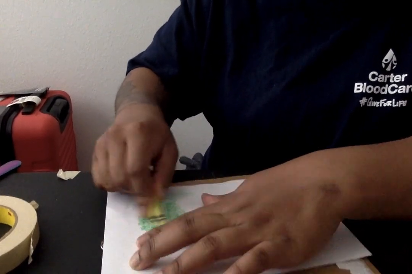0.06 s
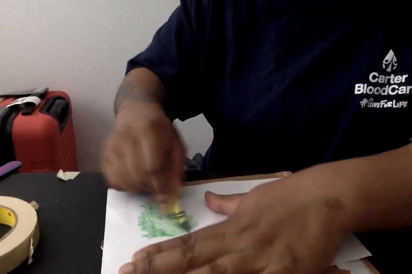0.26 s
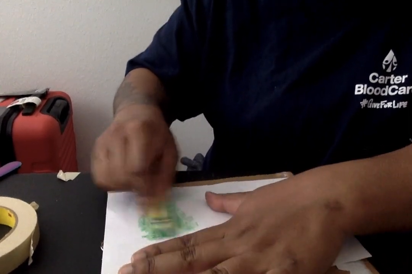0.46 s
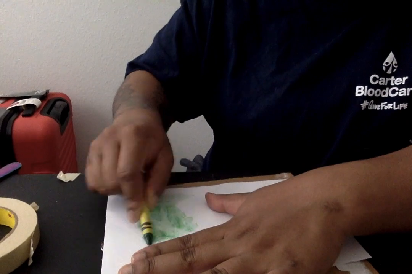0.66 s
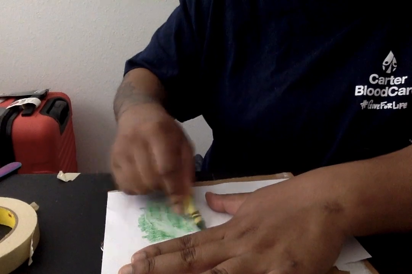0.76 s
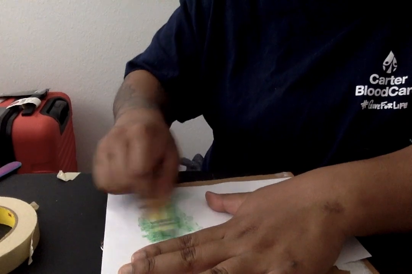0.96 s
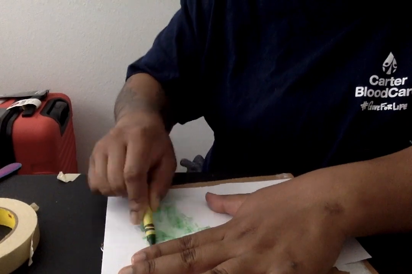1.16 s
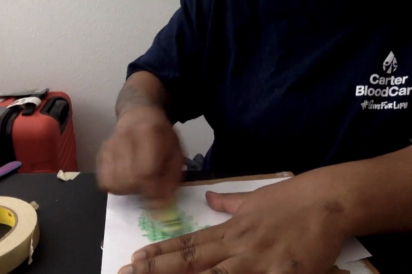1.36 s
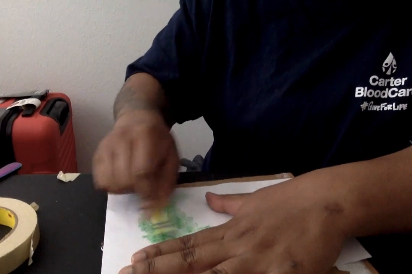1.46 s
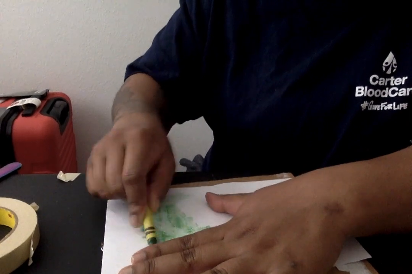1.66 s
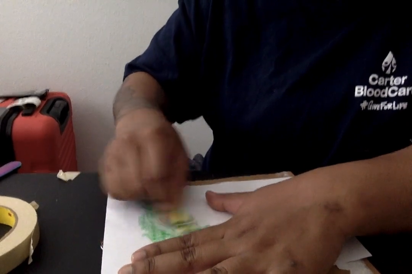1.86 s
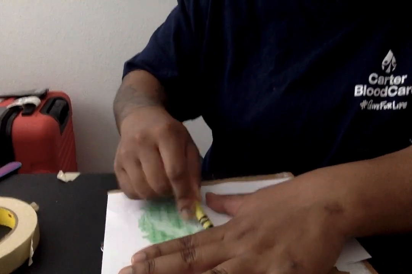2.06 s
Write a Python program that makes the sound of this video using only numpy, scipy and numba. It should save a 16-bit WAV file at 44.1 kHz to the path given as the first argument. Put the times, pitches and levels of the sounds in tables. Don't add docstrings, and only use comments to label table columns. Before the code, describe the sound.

Fast crayon strokes on a sheet of paper, low bumpy table rumble with light papery scratches

```python
import sys
import numpy as np
from scipy import signal
from scipy.fft import rfft, irfft
from scipy.io import wavfile
from scipy.ndimage import uniform_filter1d
from numba import njit

SR = 44100
rng = np.random.default_rng(int(sys.argv[2]) if len(sys.argv) > 2 else 0)


def level_to_linear(level):
    exponent = np.asarray(level, float) / 20
    return 10 ** exponent


def waveform_to_disk(signal):
    frames = np.transpose(np.atleast_2d(signal))
    scaled = np.clip(frames, -1, 1) * 32767
    samples = np.round(scaled).astype(np.int16)
    wavfile.write(sys.argv[1], SR, samples)


N = 92610

# start_s, length_s, table_db, paper_db, wax_db
STROKES = [(0.0, 0.14, -69.5, -64.5, -72), (0.084, 0.17, -46.5, -66.5, -81.5),
           (0.212, 0.13, -49.5, -62.5, -65), (0.334, 0.12, -60.5, -66.5, -74),
           (0.457, 0.13, -57.5, -74, -77.5), (0.577, 0.12, -60.5, -73, -76.5),
           (0.714, 0.11, -51.5, -71, -75.5), (0.826, 0.11, -60, -71.5, -76),
           (0.974, 0.13, -51, -69.5, -77.5), (1.091, 0.11, -54, -69, -75), (1.236, 0.1, -48, -66, -76.5),
           (1.337, 0.14, -57.5, -69.5, -76), (1.487, 0.13, -49, -62.5, -77),
           (1.601, 0.11, -45.5, -61.5, -74.5), (1.73, 0.14, -52, -67.5, -76), (1.87, 0.088, -53, -67, -75),
           (2, 0.11, -54, -68, -78)]
# centre_hz, width_hz, level_db
TABLE_MODES = [(135.3, 70, -2), (175, 76, 1), (250, 37.7, 1), (328.5, 60, -6), (390, 180, -11.5),
               (529.6, 100, -7), (739, 370, -11.5), (846, 490, -11)]
# centre_hz, width_hz, level_db
PAPER_MODES = [(1314, 2000, -5.5), (1950, 320, -3.5), (2450, 158, -1.5), (2953, 820, -1.5),
               (4050, 350, -9.5)]
# centre_hz, width_hz, level_db
WAX_MODES = [(4290, 2900, -1.5), (5800, 1020, -5.5), (9250, 1700, -11), (11500, 8400, -4),
             (13900, 1900, -3)]
# start_s, peak_db, pitch_hz, ring_t60_s, knock_db
BUMPS = [(.008, -53.5, 132.4, 0.26, 0.5), (0.117, -25.5, 134.5, 0.091, -16.5),
         (0.133, -31, 133.8, 0.27, -4.5), (0.194, -37.5, 335, 0.046, -14), (.222, -25.5, 241, 0.024, -9),
         (0.229, -28, 158, 0.036, -41), (0.261, -40, 173, 0.076, -1.5), (0.289, -36, 175, 0.036, -29),
         (0.318, -44, 131, 0.052, -45), (0.386, -33.5, 176, 0.052, -8.5), (.41, -36.5, 164.6, 0.032, -16),
         (0.5, -60.5, 246, 0.13, -17), (0.521, -47, 133.6, 0.16, -12), (0.738, -49, 154, 0.022, -10),
          (0.784, -40.5, 243, 0.042, -27), (0.868, -42, 250, 0.061, -21), (0.913, -46.5, 167, 0.077, -14),
          (0.997, -48, 250, 0.059, -1), (1.046, -31, 240.7, 0.056, -10.5),
          (1.129, -34.5, 163.3, 0.07, -16.5), (1.176, -37, 163.4, 0.09, -14.5),
          (1.244, -51, 216, 0.074, -5.5), (1.257, -35.5, 232, 0.035, -11.5),
          (1.294, -33.5, 187, 0.075, -12.5), (1.38, -33, 165.6, 0.067, -25.5),
          (1.418, -41, 162.3, 0.093, -11.5), (1.502, -45, 247, 0.066, -9), (1.522, -42, 204, 0.058, -2.5),
          (1.543, -34, 201.6, 0.071, -12.5), (1.6371, -30.5, 200.4, 0.033, -10.5),
          (1.684, -38.5, 167.7, 0.11, -13), (1.766, -47, 268, 0.033, -33),
          (1.799, -40.5, 184.2, 0.055, -15), (1.946, -47.5, 168, 0.046, -11.5),
          (2.039, -43.5, 236, 0.072, -7),
         (.003, -49, 153, 0.01, -2.5),
    (0.09, -52, 244, 0.018, -18),
    (0.237, -36.5, 213, 0.029, -4),
    (.306, -49, 199, 0.026, -23),
    (1.557, -41, 171, 0.039, -22),
    (1.579, -48, 144, 0.073, -32),
    (1.648, -39, 191.5, 0.057, -14),
    (2.027, -47.5, 240, 0.035, -34),
    (2.051, -50, 250, 0.057, -20),
]
# centre_hz, width_hz, level_db
KNOCK_MODES = [(335, 188, 3), (564, 320, -10.5), (760, 456, -5.5), (990, 380, -13)]
# start_s, peak_db, pitch_hz, crack_db
SNAPS = [(.0034, -47.5, 2200, 6), (.004, -48.5, 4000, -16.5), (0.0418, -46.5, 2060, -26),
         (0.1143, -38.5, 2330, -8.5), (0.1146, -44.5, 3840, -16), (.12, -36, 1950, -33),
         (.351, -60.5, 2360, -25), (.387, -49.5, 2370, -11), (.522, -58, 2450, -28),
         (0.794, -61.5, 3170, -30), (0.87, -69, 2450, -25), (1.023, -55.5, 2460, -25),
         (1.114, -61, 2350, -19), (1.274, -56.5, 3980, -34), (1.277, -47.5, 2270, -34),
         (1.306, -54.5, 2580, -25), (1.3859, -42, 2380, -21), (1.3845, -53, 4050, -30),
         (1.4, -45.5, 2420, -27), (1.42, -51.5, 2440, -30), (1.524, -45, 2310, -23),
         (1.526, -47, 3740, -26), (1.6292, -46, 2100, -20), (1.637, -47.5, 3200, -24),
         (1.8113, -45, 3100, -29), (1.8264, -46.5, 2400, -32), (1.846, -54.5, 2420, -38),
         (1.903, -55.5, 2170, -20), (2.0661, -44, 2660, -32), (2.082, -51, 2930, -25),
         (.61, -64.5, 2020, -35), (0.7565, -62.5, 2840, -30), (1.027, -59, 1950, -30),
         (1.252, -75, 2190, -30), (1.381, -57, 2270, -32), (1.7836, -55, 2540, -25),
         (1.905, -57, 4050, -35), (1.833, -55, 2560, -35), (2.0671, -46.5, 2130, -37),
         (2.066, -53.5, 3370, -35)]
# start_s, peak_db, pitch_hz
TAPS = [(0.043, -49.5, 1710), (.0425, -47, 2740), (0.115, -48, 1530), (.193, -42, 538),
        (0.387, -54.5, 1800), (.218, -38, 737), (0.219, -47, 1320), (.2205, -31, 375.5), (.499, -57, 540),
        (.648, -59.5, 520), (.744, -54, 506), (1.003, -49.5, 517), (1.026, -46, 580), (1.026, -67, 900),
        (1.11, -76, 970), (1.174, -54.5, 595), (1.245, -51, 552), (1.259, -47.5, 526), (1.294, -61, 970),
        (1.528, -44, 864), (1.533, -47.5, 519), (1.632, -57, 1035), (1.638, -44, 563), (1.806, -62, 509),
        (1.907, -68, 570), (2.038, -54.5, 960)]
# start_s, length_s, level_db, lower_edge_hz
SLIDES = [
    (-.02, 0.12, -59, 12800),
    (0.117, 0.031, -83, 11200),
    (0.21, 0.039, -57.5, 11500),
    (0.25, 0.054, -52.5, 11400),
    (0.352, 0.016, -72, 11500),
    (0.1121, 0.0024, -39, 11000),
    (.119, 0.0059, -57, 11000),
    (.136, 0.0039, -62, 10900),
]
# start_s, length_s, level_db, pitch_hz
FLECKS = [
    (0.747, .03, -91, 15300),
    (.765, 0.027, -93, 14300),
    (0.85, 0.039, -90, 14100),
    (1.043, .025, -78, 14300),
    (1.127, .03, -85, 15000),
    (1.526, 0.032, -90, 13500),
    (1.635, 0.038, -80, 15600),
    (1.64, 0.022, -84, 14300),
    (1.77, 0.036, -78, 14300),
    (1.885, 0.024, -79, 13900),
]
# frequency_hz, level_db
ROOM_SPECTRUM = [(18, -55), (30, -19), (245, -4.5), (426, -19), (1630, -26.5), (2480, -21), (7270, -32.5),
                 (14000, -34.5), (16000, -46)]

RISE_SHARE, RISE_POWER, FALL_POWER = 0.49, 1.88, 2.6
SLIPS_PER_S, SLIP_SCATTER_DB, RASP_PER_S, RASP_SCATTER_DB = 900, 2.5, 3000, 3.5
PAPER_LINGER = 0.75
PAPER_PATCH_DB, WAX_PATCH_DB, PATCH_S = 4, 2.5, 0.008
SWAY_HZ, SWAY_DB, SWAY_LAG_S = 77.5, -8, 0.018
BUMP_RISE_S, BUMP_DB = 0.0051, 3
SAG_SHARE, SAG_S = 0.14, 0.0055
KNOCK_S, OVERTONE_DB, MODE_RATIO = 0.011, -7, 1.45
SHEET_SHARE, SNAP_PEAK_S = 0.45, 0.00065
SNAP_TAIL_DB, SNAP_TAIL_S, CRACK_S = -12.5, 0.017, 0.00072
TAP_CYCLES = 1.6
PALM_RISE_SHARE, PALM_POWER, PALM_GRAIN_DB = 0.68, 0.8, 2
FLECK_WIDTH_HZ = 700
ROOM_DB = -76
TOP_HZ = 15800


@njit
def svf(x, hz, width):
    y, band, low = np.empty(len(x)), 0., 0.
    g, k = np.tan(np.pi * hz / SR), width / hz
    for i in range(len(x)):
        v = (band + g * (x[i] - low)) / (1 + g * (g + k))
        band, low, y[i] = 2 * v - band, low + 2 * g * v, k * v
    return y


def steep(x, hz, width):
    return svf(svf(x, float(hz), float(width)), float(hz), float(width))


def unit(x):
    return x / np.sqrt(np.mean(x ** 2))


def body(x, modes):
    out = 0
    for k, (hz, width, db) in enumerate(modes):
        out = out + (-1) ** k * level_to_linear(db) * unit(steep(x, hz, 1.13 * width))
    return out


def grains(rate, scatter_db):
    when, sign, size = rng.random((3, N))
    slips = (when < rate / SR) * np.sign(sign - 0.5)
    return slips * level_to_linear(scatter_db * np.minimum(-np.log(1 - size), 3.5))


def swell(start, length, share=RISE_SHARE, rise=RISE_POWER, fall=FALL_POWER):
    p = (np.arange(N) / SR - start) / length
    up = np.sin(np.pi / 2 * np.clip(p / share, 0, 1)) ** rise
    down = np.sin(np.pi / 2 * np.clip((1 - p) / (1 - share), 0, 1)) ** fall
    return up * down


def add(out, start, x):
    i = max(int(start * SR), 0)
    out[i:i + len(x)] += x[:N - i]


def patchy(modes, noise_share, patch_db):
    out, k = 0, int(PATCH_S * SR)
    for mode in modes:
        roughness = unit(uniform_filter1d(uniform_filter1d(rng.standard_normal(N), k), k))
        scrape = unit(grains(RASP_PER_S, RASP_SCATTER_DB)) + noise_share * rng.standard_normal(N)
        patches = unit(level_to_linear(patch_db * np.clip(roughness, -2, 2)))
        out = out + patches * body(scrape, [mode])
    return unit(out)


def rubbing():
    speed = np.array([swell(stroke[0], stroke[1]) for stroke in STROKES])
    table_db, paper_db, wax_db = np.array(STROKES).T[2:5]
    table = level_to_linear(table_db) @ speed
    paper = level_to_linear(paper_db) @ speed ** PAPER_LINGER
    wax = level_to_linear(wax_db) @ speed
    late = uniform_filter1d(np.roll(table, int(SWAY_LAG_S * SR)), 1500)
    sway = late * body(rng.standard_normal(N), [(SWAY_HZ, 40, SWAY_DB)])
    rumble = table * unit(body(grains(SLIPS_PER_S, SLIP_SCATTER_DB), TABLE_MODES))
    rasp = paper * patchy(PAPER_MODES, 1.0, PAPER_PATCH_DB)
    hiss = wax * patchy(WAX_MODES, 0.98, WAX_PATCH_DB)
    return rumble + sway + rasp + hiss


def bumps():
    out, t = np.zeros(N), np.arange(int(SR / 4)) / SR
    bent = t + SAG_SHARE * SAG_S * (1 - np.exp(-t / SAG_S))
    for s, db, hz, t60, knock_db in BUMPS:
        other_hz = hz * MODE_RATIO ** (1 if hz < 200 else -1)
        tone = np.sin(2 * np.pi * hz * bent)
        tone = tone + level_to_linear(OVERTONE_DB) * np.sin(2 * np.pi * (other_hz * bent + rng.random()))
        decay = np.exp(-np.log(1000) * t / max(t60, 0.01))
        ring = (1 - np.exp(-t / BUMP_RISE_S)) ** 2 * decay * tone
        strike = np.exp(-t / KNOCK_S) * (1 - np.exp(-t / 0.00075))
        knock = body(rng.standard_normal(len(t)) * strike, KNOCK_MODES)
        both = ring / np.abs(ring).max() + level_to_linear(knock_db) * knock / np.abs(knock).max()
        add(out, s - 0.003, level_to_linear(db + BUMP_DB) * both / 1.55)
    return out


def snaps():
    out, t = np.zeros(N), np.arange(int(SR / 10)) / SR
    for s, db, hz, crack_db in SNAPS:
        hiss, burst, wander = rng.standard_normal((3, len(t)))
        click = burst * np.exp(-((t - 0.0012) / 0.0007) ** 2)
        p = t / SNAP_PEAK_S
        ring = np.e * p * np.exp(-p) * np.sin(2 * np.pi * hz * t)
        sheet = body(click + 1e-9 * hiss, PAPER_MODES)
        grit = hiss * level_to_linear(3.2 * unit(uniform_filter1d(wander, 60)))
        tail = unit(steep(grit, hz, 760)) + 0.3 * unit(body(grit, PAPER_MODES))
        fade = np.exp(-t / SNAP_TAIL_S) * (1 - np.exp(-t / 0.00079))
        crack = level_to_linear(crack_db) * np.exp(-t / CRACK_S) * unit(svf(burst, 12000., 14000.))
        snap = ring + SHEET_SHARE * sheet / np.abs(sheet).max() + crack
        add(out, s, level_to_linear(db) * (snap + level_to_linear(SNAP_TAIL_DB) * fade * tail))
    return out


def taps():
    out, t = np.zeros(N), np.arange(int(SR / 20)) / SR
    for s, db, hz in TAPS:
        p = t * hz / TAP_CYCLES
        add(out, s - 0.001, level_to_linear(db) * np.e * p * np.exp(-p) * np.sin(2 * np.pi * hz * t))
    return out


def palm():
    out = 0
    for s, length, db, hz in SLIDES:
        edge = signal.ellip(4, 1, 24, hz, "high", fs=SR, output="sos")
        n = signal.sosfilt(edge, rng.standard_normal(N))
        hiss = unit(n + 0.6 * svf(n, 1.1 * hz, 1200.))
        out = out + level_to_linear(db) * swell(s, length, PALM_RISE_SHARE, PALM_POWER, PALM_POWER) * hiss
    grain = unit(uniform_filter1d(rng.standard_normal(N), size=90))
    return out * unit(level_to_linear(PALM_GRAIN_DB * grain))


def flecks():
    out, n = 0, rng.standard_normal(N)
    for s, length, db, hz in FLECKS:
        squeak = unit(body(n, [(hz, FLECK_WIDTH_HZ, 0)]))
        out = out + level_to_linear(db) * swell(s, length, 0.4, 1, 1) * squeak
    return out


def room():
    log_hz = np.log(np.maximum(np.fft.rfftfreq(N, 1 / SR), 1))
    hz, level_db = np.array(ROOM_SPECTRUM).T
    db = np.interp(log_hz, np.log(hz), level_db)
    return level_to_linear(ROOM_DB) * unit(irfft(rfft(rng.standard_normal(N)) * level_to_linear(db), N))


def scene():
    dry = rubbing() + bumps() + snaps() + taps() + palm() + flecks()
    t = np.arange(int(SR / 5)) / SR
    wash = unit(rng.standard_normal(len(t)) * np.exp(-t / 0.028) * (t > 0.004)) / np.sqrt(len(t))
    return (dry + level_to_linear(-14.5) * signal.fftconvolve(dry, wash)[:N] + room())[None]


def band_limit(x):
    return signal.sosfilt(signal.butter(12, 16680, fs=SR, output="sos"), x)


def record(dry):
    mix = signal.sosfilt(signal.ellip(8, 0.2, 60, TOP_HZ, fs=SR, output="sos"), dry)
    mix = signal.sosfilt(signal.butter(2, 60, "high", fs=SR, output="sos"), mix)
    return band_limit(mix)


dry = scene()
out = record(dry)
waveform_to_disk(out)
```